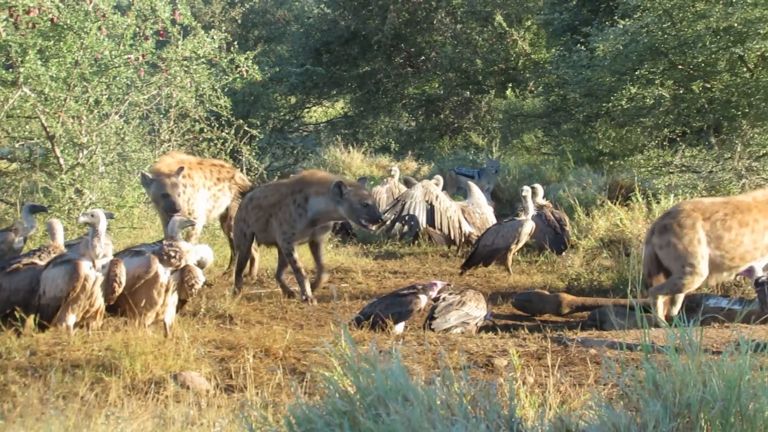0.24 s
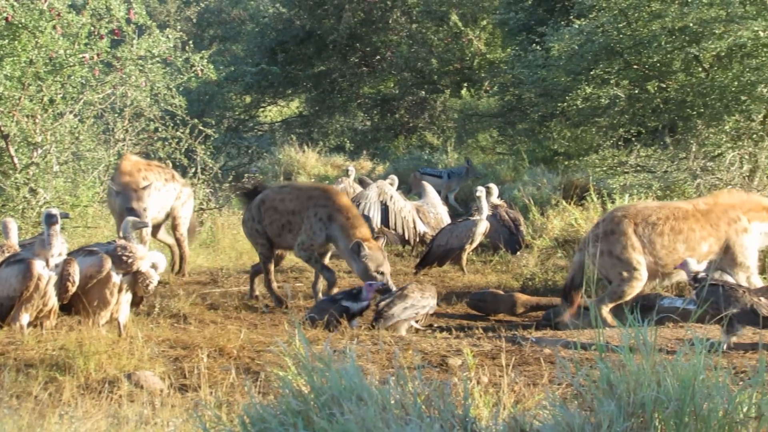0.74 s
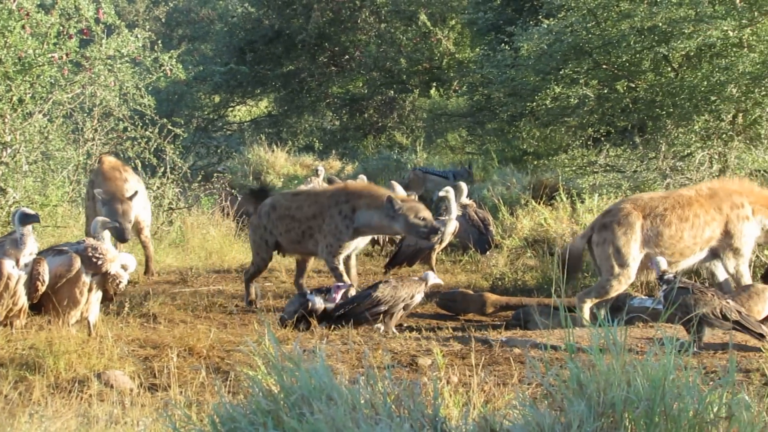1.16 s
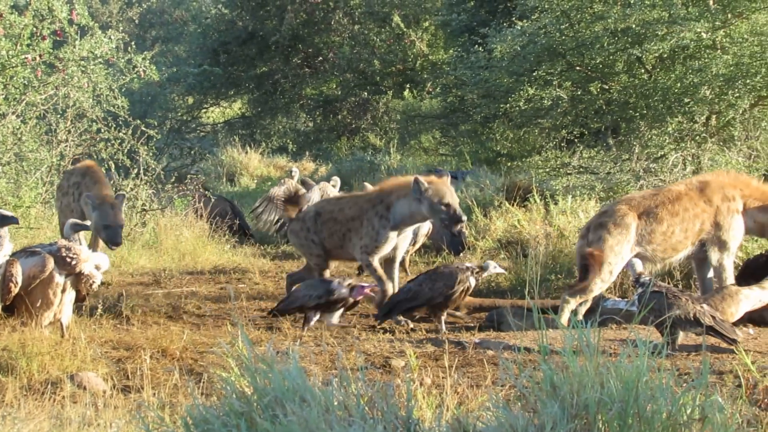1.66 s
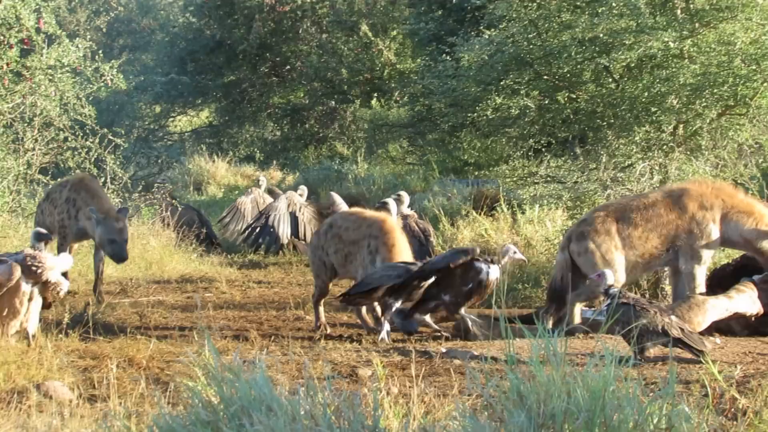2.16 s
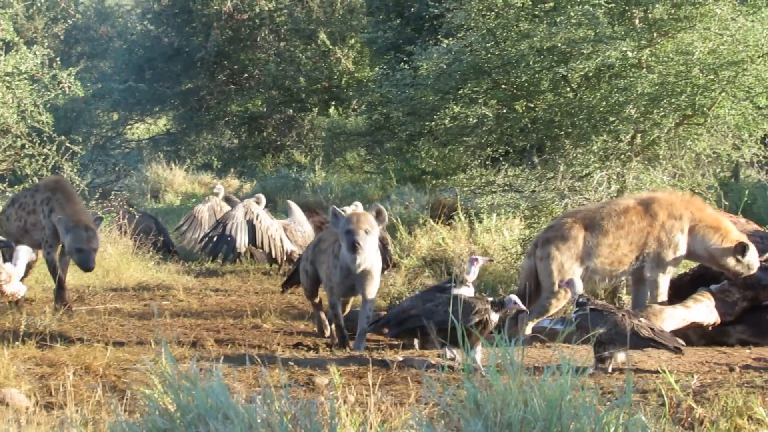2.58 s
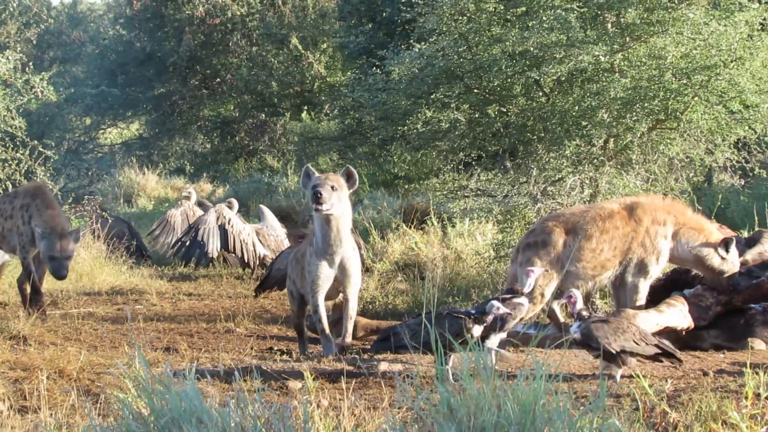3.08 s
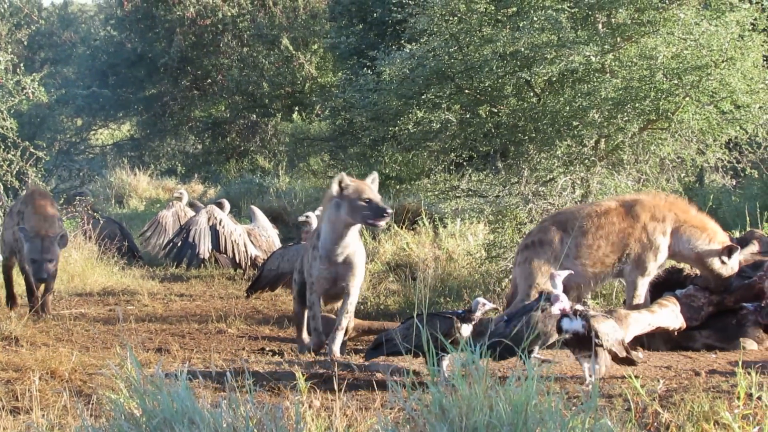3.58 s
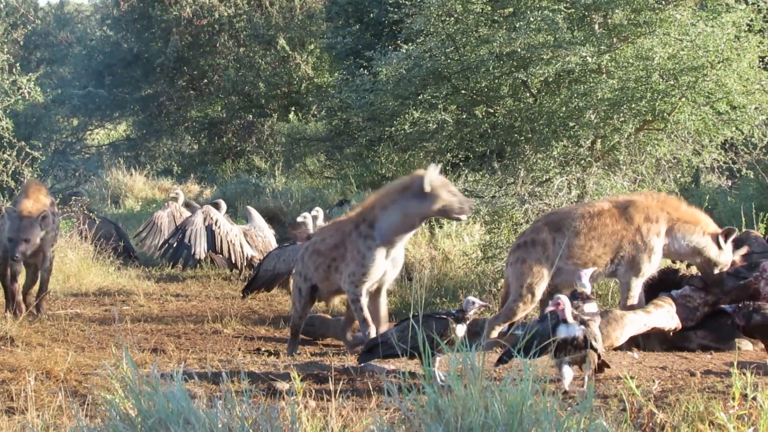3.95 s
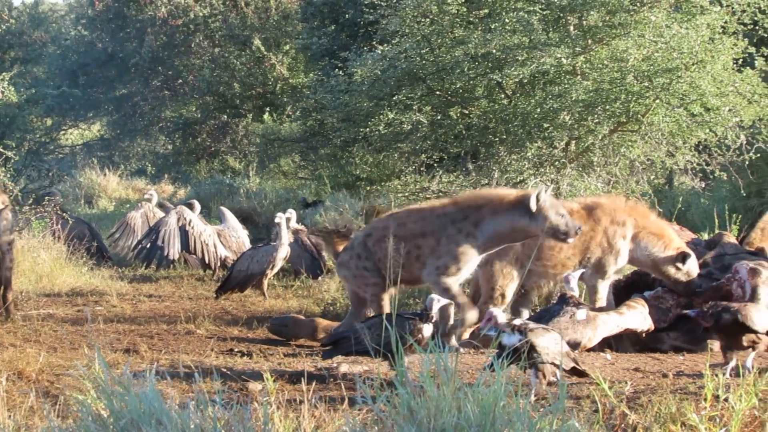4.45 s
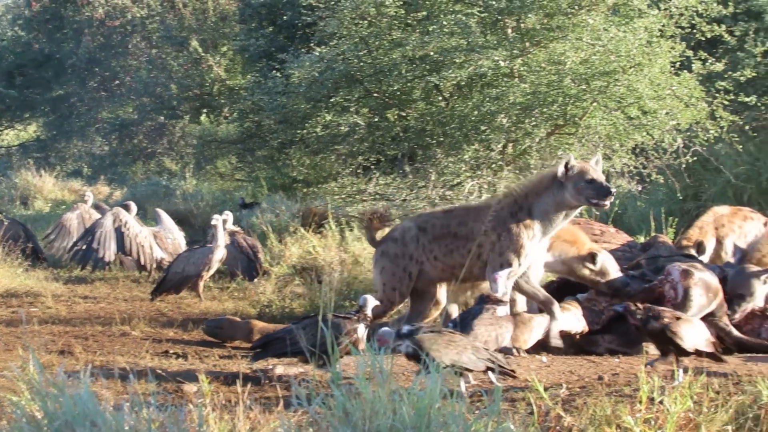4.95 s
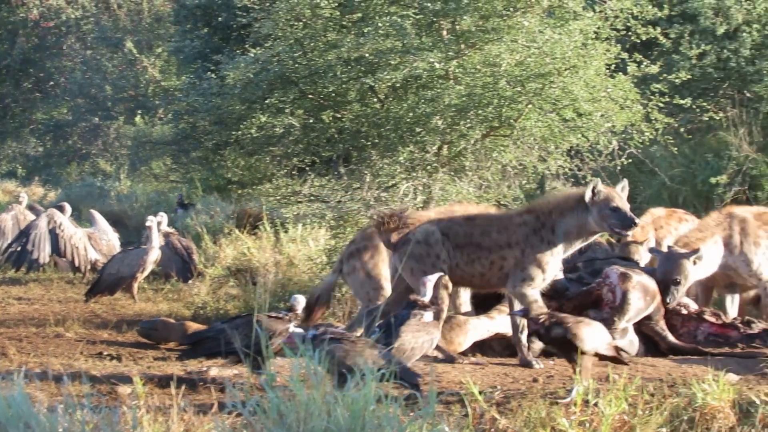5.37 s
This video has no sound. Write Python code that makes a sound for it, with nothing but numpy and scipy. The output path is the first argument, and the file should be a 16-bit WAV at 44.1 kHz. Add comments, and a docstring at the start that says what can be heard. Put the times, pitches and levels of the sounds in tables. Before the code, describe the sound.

Hyenas and vultures feed outdoors, heard in stereo with light reflections from trees. After a harsh bird squawk and a flurry of snaps and earthy thuds, a hyena gives a fast, high, chattering cackle that sinks and turns raspy. A brisk feather swish follows, then a calmer gap, one loud clipped squeal, a few knocks, thin bird pips, more squawks and breathy vulture hisses over soft air.

```python
"""Air rushes softly throughout over open bush while small birds whistle and one bird repeats a harsh squawk.
At a carcass a little to the right, thuds, snaps and a vulture's hiss lead into a fast, shrill hyena cackle.
Wings brush dry grass around and after it; then comes one squeal, and pips and late hisses follow.
Voices are pulses and noise puffs ringing a throat, whistles are gliding sines, and the rest is shaped noise."""
import sys
import numpy as np
from scipy import signal
from scipy.fft import rfft, irfft, next_fast_len
from scipy.io import wavfile

SR = 44100
rng = np.random.default_rng(int(sys.argv[2]) if len(sys.argv) > 2 else 0)


def master_out(mix):
    """Clip the mix to full scale and print it as 16-bit PCM to the path in sys.argv[1]."""
    frames = np.transpose(np.atleast_2d(mix))
    ceiling = np.clip(frames, -1, 1)
    pcm = np.round(ceiling * 32767).astype(np.int16)
    wavfile.write(sys.argv[1], SR, pcm)


N = 248194

# spectrum of the air: f/Hz, relative level/dB per Hz
AIR_SPECTRUM = [(20, -6.5), (50, 0), (100, 3.5), (220, 4), (400, 2.4), (800, 0.5), (1250, -3.5), (2000, -6),
                (2900, -7), (3900, -12), (6300, -14.5), (10000, -18), (13000, -21.5), (15500, -27)]
# left-right likeness of the air: f/Hz, correlation
AIR_CORRELATION = [(30, -0.77), (120, -0.72), (250, -0.63), (500, -0.45), (1000, -0.33), (2500, 0.04),
                   (6000, 0.19), (12000, -0.03)]
AIR_DB = -52.5

# whistled glides of small birds: t/s, length/s, start f/Hz, end f/Hz, level/dB
WHISTLES = [(0.042, .05, 3700, 2610, -52), (0.076, 0.042, 3310, 3060, -57.5),
            (0.427, 0.11, 4350, 3640, -60), (0.51, 0.055, 3300, 2338, -51.5),
            (1.962, .13, 1910, 1883, -65.5), (2.36, 0.1, 3020, 3045, -58),
            (3.629, 0.021, 6430, 5760, -57.5), (3.723, .04, 3400, 3220, -51.5),
            (5.523, 0.036, 3450, 3036, -51)]
# short falling pips of small birds: t/s, f/Hz, level/dB
PIPS = [(3.13, 2586, -53), (3.196, 1750, -57.5), (3.444, 1720, -58.5), (4.002, 1760, -56.5),
        (4.015, 2566, -53), (4.231, 1730, -55), (4.436, 1740, -51), (4.672, 1740, -52),
        (4.872, 2575, -55.5), (5.135, 1380, -57), (5.492, 1720, -55.5)]
PIP_S, PIP_FALL_HZ = 0.029, 150
WAVER_PER_KHZ = 0.0078  # depth of the pitch waver as a share, per kHz of starting pitch
# ranges of the far chirps: pitch, length, end pitch over start pitch
CHIRP_HZ, CHIRP_S, CHIRP_GLIDE = (2385, 3990), (.03, .08), (.76, 1.02)

# one bird's squawks: t/s of the peak, top f/Hz, level/dB, roughness at the peak (0-1)
SQUAWKS = [(.262, 621, -46, 0.54), (1.830, 592.6, -47, 0.55), (2.345, 643, -47, 0.86),
           (2.806, 669.4, -45.5, 0.71), (3.660, 566, -46, 0.42), (4.157, 589, -48.5, 0.83),
           (4.744, 667, -46, 0.82), (5.260, 535, -53.5, 0.67)]
# resonances of its throat: f/Hz, width/Hz, level/dB
SQUAWK_THROAT = [(1620, 380, -12), (2680, 720, 0), (3550, 520, -11)]
SQUAWK_SWELL_S, SQUAWK_FADE_S, SQUAWK_START_HZ = .053, 0.0235, 510

# vulture hisses: t/s, time until the release/s, level/dB, upper edge f/Hz
HISSES = [(.58, .62, -53, 6170), (1.25, 0.41, -51.5, 7400), (1.7, 0.44, -60, 5000), (2.82, 0.1, -55, 5200),
          (4.57, .58, -54.5, 5080), (5.16, 0.48, -53.5, 6700)]
# colour that the vulture's throat gives to breath noise: f/Hz, level/dB
HISS_COLOUR = [(1200, -24), (2000, -5), (2400, 1), (3200, 1.5), (3700, -8), (4100, 2), (4700, 3.5),
               (5300, -2.5), (6500, 0), (9000, -11.5), (15000, -15)]
HISS_ATTACK_S, HISS_RELEASE = 0.056, 0.27  # release time constant, as a share of the time until release

# feathers brushing dry grass: t/s of the peak, swell/s, fade/s, level/dB, centre f/Hz, width/Hz
SWISHES = [(.64, .12, .14, -61, 7600, 3500), (1.249, .55, 0.33, -69, 8000, 5000),
           (1.488, .059, 0.031, -44, 7800, 4000), (1.481, 0.05, 0.028, -46, 3770, 3020),
           (1.53, .03, 0.048, -45, 5400, 2780), (1.55, .066, .19, -62, 10000, 3200),
           (2.15, 0.16, 0.12, -63, 6750, 5000)]
# feet and wings striking the earth: t/s, level/dB, centre f/Hz, t60/s
THUDS = [(.400, -47.5, 450, .065), (.604, -46, 433, .07), (.653, -41.5, 500, .03), (.666, -36.5, 660, .045),
         (.695, -48.5, 500, .09), (1.025, -45.5, 500, .06), (1.441, -48, 500, .09), (3.153, -51, 500, .084),
         (3.197, -48, 450, .06), (3.215, -43.5, 460, .055), (5.063, -50, 500, .035)]
# dry snaps of beaks, twigs and bone: t/s, level/dB, centre f/Hz, t60/s
SNAPS = [(.403, -46.5, 4000, 0.044), (.498, -42.5, 3680, 0.025), (.542, -40, 4200, 0.014),
         (0.584, -40, 4350, .02), (.612, -46.5, 5470, 0.033), (.653, -38, 2730, .018),
         (1.616, -44.5, 4500, 0.045), (2.285, -45.5, 2200, 0.017), (3.155, -47.5, 3160, 0.11),
         (3.16, -50, 7000, .1), (3.749, -45, 7140, 0.023), (4.034, -54.5, 6540, .04),
         (4.39, -50.5, 5000, .017)]
TICK_HZ, TICK_T60_S = (4000, 8000), 0.018  # faint ticks of trodden stalks

# cackle syllables, clear then rasping: t/s, clear part/s, whole length/s, f/Hz, clear level/dB, rasp level/dB
CACKLE = [(0.719, 0.032, 0.06, 810.5, -34.5, -40.5), (0.807, 0.015, 0.029, 828, -32, -41),
          (.872, .012, 0.033, 805, -32, -36.5), (.953, 0.0084, 0.037, 763, -34, -39.5),
          (1.032, 0.0114, 0.0338, 745, -34.5, -36), (1.135, 0.019, 0.041, 695, -36, -46.5),
          (1.233, 0.018, 0.061, 682, -37.5, -43)]
# the lone squeal, one row with the columns of CACKLE
SQUEAL = (2.8942, .0128, .041, 691, -29.8, -38.2)
# throat resonances beside the main one, in the cackle: f/Hz, width/Hz, level/dB
CACKLE_THROAT = [(742, 260, -20), (1440, 170, -24), (3060, 420, -19), (4160, 480, -29.5), (5900, 3000, -33),
                 (9100, 1600, -26), (12000, 3000, -48)]
# throat resonances beside the main one, in the squeal: f/Hz, width/Hz, level/dB
SQUEAL_THROAT = [(740, 440, -29), (1380, 440, -28), (2700, 530, -26), (4230, 620, -8.5), (8100, 1450, -21),
                 (11000, 5000, -37)]
# the cackle drifts evenly over its run (first syllable, last syllable)
CACKLE_SAG = (0.167, 0.054)  # fall of pitch within a syllable, as a share
CACKLE_ROUGH = (0.47, .95)  # roughness of the rasp, 0-1
CACKLE_THROAT_HZ = (2270, 2463)  # main resonance
CACKLE_PRESS_DB = (-5.5, 9.5)  # added to the side resonances in the clear part
CACKLE_PAN_DB = (-5, -9)  # left minus right
SCOOP, SCOOP_FADE_S = 0.152, 0.13  # start under pitch, as a share; time constant of its loss over the run
LEAP_S = 0.00804  # time constant of the pitch settling after it leaps at the break

TOP_HZ = 15700


def undb(db):
    """Logarithmic level: decibels become an amplitude ratio."""
    return 10 ** (np.asarray(db) / 20)


def unit(x):
    """Normalisation: scale to rms 1."""
    return x / np.sqrt(np.mean(x ** 2) + 1e-20)


def clock(length):
    """Sampling: the sample times of a short sound."""
    return np.arange(max(int(length * SR), 64)) / SR


def shape(x, gain):
    """Linear filtering: multiply the spectrum by a gain that is a function of frequency."""
    size = next_fast_len(x.shape[-1] + 512)
    f = np.fft.rfftfreq(size, 1 / SR) + 1  # the offset keeps f above zero
    return irfft(rfft(x, size) * gain(f), size)[..., :x.shape[-1]]


def along(points, f):
    """Logarithmic frequency scale: read (f/Hz, value) points between their knots."""
    hz, value = np.transpose(points)
    return np.interp(np.log(f), np.log(hz), value)


def resonate(x, modes):
    """Parallel resonance: steep peaks (f/Hz, width/Hz, level/dB) side by side."""
    def gain(f):
        return sum(undb(db) / (1 + ((f * f - hz * hz) / (f * width)) ** 2) for hz, width, db in modes)
    return shape(x, gain)


def wobble(count, rate):
    """Random modulation: straight lines join Gaussian values drawn at a rate in Hz."""
    place = np.arange(count) * rate / SR
    knots = rng.standard_normal(int(place[-1]) + 2)
    return np.interp(place, np.arange(len(knots)), knots)


def swell(t, rise, fall):
    """Amplitude envelope: a rounded rise and fall that peaks at t = rise."""
    return np.sin(np.pi / 2 * np.interp(t, [0, rise, rise + fall], [0, 1, 0])) ** 2


def gate(t, start, end, edge):
    """Amplitude gating: on between start and end, with short linear ramps."""
    return np.clip((t - start) / edge, 0, 1) * np.clip((end - t) / edge, 0, 1)


def add(out, start, x, pan_db=0, lag=0):
    """Stereo localisation: pan_db is the level of left minus right; left arrives lag seconds later."""
    sounds = np.broadcast_to(x, (2, x.shape[-1]))
    for row, sound, side, delay in zip(out, sounds, (.5, -.5), (lag, 0)):
        i = max(int((start + delay) * SR), 0)
        row[i:i + len(sound)] += undb(side * pan_db) * sound[:max(N - i, 0)]


def wide_noise(count, shared):
    """Partial coherence: left and right noise with a share of power in common."""
    shared = np.clip(shared, 0, 1)
    common = np.sqrt(shared) * rng.standard_normal(count)
    return common + np.sqrt(1 - shared) * rng.standard_normal((2, count))


def voice(hz, rough, throat, jitter, rasp, shimmer_db):
    """Source and filter: spread-out pulses ring a throat; roughness makes them uneven and adds noise puffs."""
    count, rough = len(hz), np.clip(rough, 0, 1)
    uneven_hz = hz * (1 + jitter * rough * wobble(count, 705.4))
    phase = 2 * np.pi * np.cumsum(uneven_hz) / SR
    orders = np.arange(1, 20)
    # random harmonic phases spread each pulse out
    offsets = rng.uniform(0, 2 * np.pi, len(orders))
    pulses = np.cos(np.outer(phase, orders) + offsets).sum(1)
    puffs = rng.standard_normal(count) * (1 + .5 * np.cos(phase))
    tone = np.sqrt(1 - rough ** 2) * unit(resonate(pulses, throat))
    noise = rasp * rough * unit(resonate(puffs, throat))
    shimmer = undb(shimmer_db * np.sqrt(rough) * wobble(count, 270.0))
    return unit((tone + noise) * shimmer)


def bush(x, near_db, far_db, t60):
    """Scattering and reverberation: ground scatters at once, the line of trees returns a faint, dull tail."""
    t = clock(.5)
    near = rng.standard_normal((2, len(t))) * np.exp(-t / 0.0041)
    far = resonate(rng.standard_normal((2, len(t))), [(3240, 4600, 0)])
    far = far * np.exp(-np.log(1000) * t / t60) * np.minimum(t / 0.0067, 1)
    echo = (undb(near_db) * unit(near) + undb(far_db) * unit(far)) / np.sqrt(len(t))
    return x + signal.fftconvolve(x, echo, axes=1)[:, :N]


def air():
    """Broadband noise: a soft rush over the plain; opposed left and right make the bass wide."""
    sign = np.array([[1], [-1]])

    def gain(f):
        return undb(along(AIR_SPECTRUM, f)) * np.sqrt(np.clip(1 + sign * along(AIR_CORRELATION, f), 0, 2))
    mid, side = shape(rng.standard_normal((2, N)), gain)
    return unit(mid + sign * side) * undb(AIR_DB + 0.32 * wobble(N, 6.3))


def far_chirps(count, db, spread_db):
    """Random occurrence: faint chirps deeper in the bush, most of them falling; rows as in WHISTLES."""
    when, span, pitch, glide, size = rng.random((count, 5)).T
    starts = (np.arange(count) + when) / count * N / SR  # one in each equal slot of time
    lengths = np.interp(span, [0, 1], CHIRP_S)
    hz = np.interp(pitch, [0, 1], CHIRP_HZ)
    end_hz = hz * np.interp(glide, [0, 1], CHIRP_GLIDE)
    return list(zip(starts, lengths, hz, end_hz, db - spread_db * size))


def small_birds():
    """Frequency modulation: thin sine glides from the trees, wavering more at higher pitch."""
    out = np.zeros((2, N))
    pips = [(start, PIP_S, hz, hz - PIP_FALL_HZ, db) for start, hz, db in PIPS]
    for start, length, hz, end_hz, db in pips + WHISTLES + far_chirps(count=34, db=-60.5, spread_db=5):
        t = clock(length)
        waver = 1 + WAVER_PER_KHZ * hz / 1000 * wobble(len(t), 306)
        pitch = np.geomspace(hz, end_hz, len(t)) * waver
        note = np.sin(2 * np.pi * np.cumsum(pitch) / SR)
        envelope = swell(t, 0.45 * length, 0.98 * length) ** 0.5
        add(out, start, undb(db) * envelope * note, pan_db=-7.5)
    return out


def squawks():
    """Forced oscillation: each squawk arches up as a clearer note and turns harsh as it is forced."""
    out = np.zeros((2, N))
    rise, fall = SQUAWK_SWELL_S, SQUAWK_FADE_S
    t = clock(rise + fall)
    for peak, top_hz, db, rough in SQUAWKS:
        bends = [SQUAWK_START_HZ, top_hz, top_hz, .88 * top_hz]
        pitch = np.interp(t, [0, .85 * rise, rise, rise + fall], bends)
        roughness = rough * np.interp(t, [0.52 * rise, rise], [.25, 1])
        call = voice(pitch, roughness, SQUAWK_THROAT, jitter=0.066, rasp=1.26, shimmer_db=-2.5)
        add(out, peak - rise, undb(db) * swell(t, rise, fall) ** 0.77 * call, pan_db=-8.5, lag=0.00038)
    return out


def hiss():
    """Filtered turbulence: breath through fixed throat resonances; a wider beak lets the hiss reach higher."""
    out = np.zeros((2, N))
    for start, length, db, edge_hz in HISSES:
        t = clock(3 * length)

        def gain(f):
            above_edge = np.clip((f - edge_hz) / 500 + .5, 0, 1)
            return undb(along(HISS_COLOUR, f) - 8.2 * above_edge)
        sound = unit(shape(wide_noise(len(t), shared=0.48), gain))
        release = np.exp(-np.maximum(t - length, 0) / (HISS_RELEASE * length))
        envelope = np.minimum(t / HISS_ATTACK_S, 1) * release
        add(out, start, sound * envelope * undb(db + 1.65 * wobble(len(t), 24.6)), pan_db=-2.5)
    return out


def wings():
    """Friction noise: feathers sweep through grass in a grainy swish."""
    out = np.zeros((2, N))
    for peak, rise, fall, db, hz, width in SWISHES:
        t = clock(rise + fall)
        grains = wide_noise(len(t), shared=0.49) * undb(2.6 * wobble(len(t), 500))
        brush = unit(resonate(grains, [(hz, width, 0)]))
        add(out, peak - rise, undb(db) * swell(t, rise, fall) ** 0.48 * brush)
    return out


def stalk_ticks(count, db, spread_db):
    """Random impact: dry stalks tick underfoot at chance times; rows as in SNAPS."""
    when, pitch, size = rng.random((count, 3)).T
    hz = np.interp(pitch, [0, 1], TICK_HZ)
    return list(zip(when * N / SR, db - spread_db * size, hz, np.full(count, TICK_T60_S)))


def blows(table, breadth, shared, pan_db):
    """Damped impact: short noise bursts die away exponentially in one broad resonance."""
    out = np.zeros((2, N))
    for start, db, hz, t60 in table:
        t = clock(t60)
        burst = unit(resonate(wide_noise(len(t), shared), [(hz, breadth * hz, 0)]))
        decay = gate(t, 0, t60, 0.00017) * np.exp(-np.log(1000) * t / t60)
        add(out, start, burst * undb(db) * decay, pan_db)
    return out


def syllable(out, row, throat, throat_hz, width_hz, sag, scoop, leap, clear_rough, rough, press_db, fade_db, pan_db):
    """Register break: pitch scoops up and sags; the clear note dips briefly and goes on as a fading rasp."""
    start, clear, length, hz, clear_db, rasp_db = row
    t = clock(length)
    pitch = hz * np.interp(t, [0, clear / 2, length], [1 - scoop, 1, 1 - sag])
    broken = pitch * (1 + leap * np.exp(-np.maximum(t - clear, 0) / LEAP_S))
    main = [(throat_hz, width_hz, 0)]
    # a pressed opening spreads energy from the main resonance into the others
    pressed = main + [(f, width, db + press_db) for f, width, db in throat]
    note = voice(pitch, clear_rough, pressed, jitter=0.12, rasp=0.68, shimmer_db=-1.0)
    rattle = voice(broken, rough, main + throat, jitter=.08, rasp=1.05, shimmer_db=2.5)
    note_gain = undb(clear_db) * gate(t, 0, clear + 0.0022, 0.33 * clear)
    fading_db = rasp_db + fade_db * np.interp(t, [clear, length], [1, -1])
    rattle_gain = undb(fading_db) * gate(t, clear, length, 0.0046)
    add(out, start, note_gain * note + rattle_gain * rattle, pan_db, lag=1 / SR)


def quarrel():
    """Phonation under effort: seven cackles slow, sink and roughen, moving right; then a single squeal."""
    out = np.zeros((2, N))
    first, last = CACKLE[0][0], CACKLE[-1][0]
    for row in CACKLE:
        def drift(ends):
            return np.interp(row[0], [first, last], ends)
        syllable(out, row, CACKLE_THROAT, throat_hz=drift(CACKLE_THROAT_HZ), width_hz=590,
                 sag=drift(CACKLE_SAG), scoop=SCOOP * np.exp((first - row[0]) / SCOOP_FADE_S), leap=0.0416,
                 clear_rough=0.32, rough=drift(CACKLE_ROUGH), press_db=drift(CACKLE_PRESS_DB),
                 fade_db=4.5, pan_db=drift(CACKLE_PAN_DB))
    syllable(out, SQUEAL, SQUEAL_THROAT, throat_hz=2100, width_hz=440, sag=0, scoop=.04, leap=.2,
             clear_rough=.2, rough=.56, press_db=1, fade_db=4.5, pan_db=-6.5)
    return out


def scene():
    """Superposition: the air all round, the birds further off, the fight close by."""
    songbirds = bush(small_birds(), near_db=-4.5, far_db=-8, t60=0.77)
    squawkers = bush(squawks(), near_db=-1, far_db=-12.5, t60=0.65)
    ticks = stalk_ticks(count=12, db=-52, spread_db=1)
    snaps = blows(SNAPS + ticks, breadth=0.72, shared=0.32, pan_db=0.0)
    thuds = blows(THUDS, breadth=1.01, shared=0.58, pan_db=0.5)
    fight = bush(quarrel() + snaps + thuds + wings(), near_db=-20, far_db=-19, t60=0.73)
    return air() + songbirds + squawkers + hiss() + fight


def record(dry):
    """Band limiting: a steep zero-phase low-pass removes the top of the treble."""
    low_pass = signal.ellip(10, .05, 60, TOP_HZ, fs=SR, output="sos")
    return signal.sosfiltfilt(low_pass, dry)


dry = scene()
out = record(dry)
master_out(out)
```